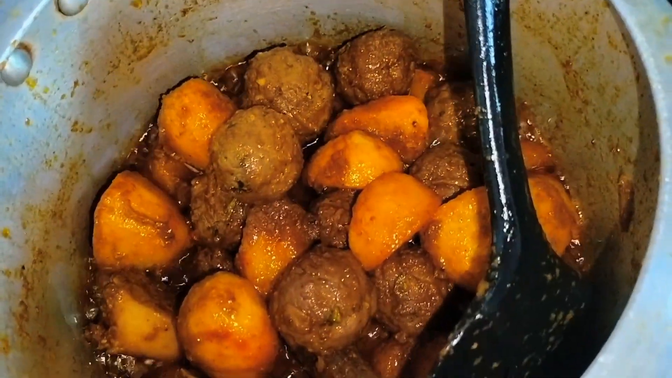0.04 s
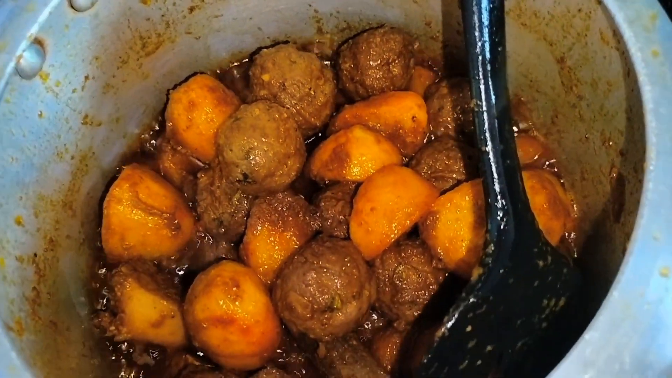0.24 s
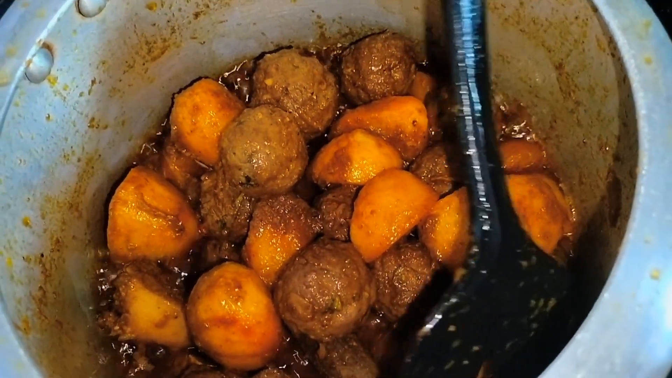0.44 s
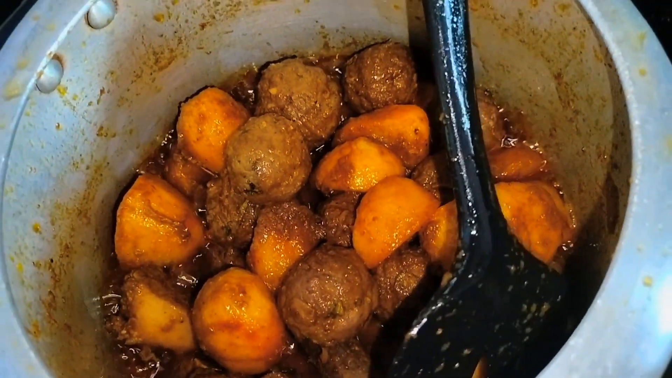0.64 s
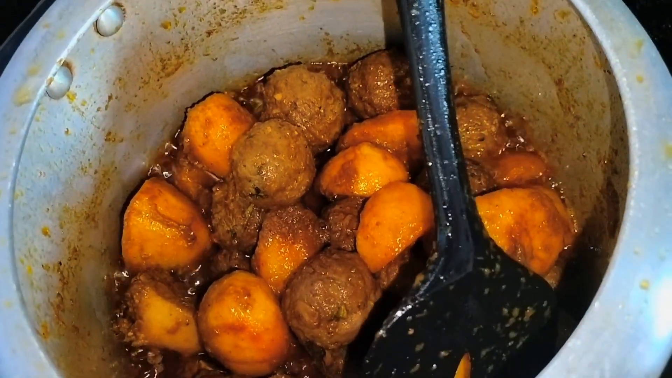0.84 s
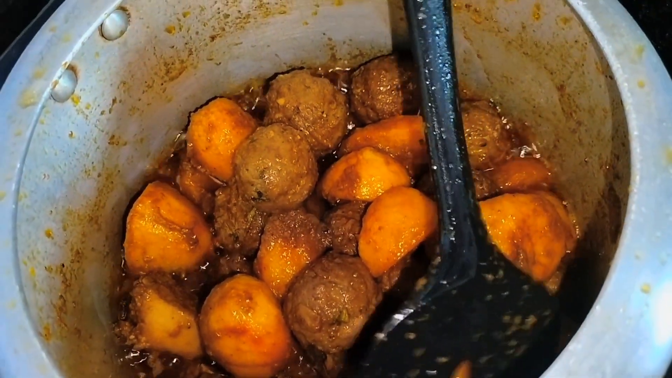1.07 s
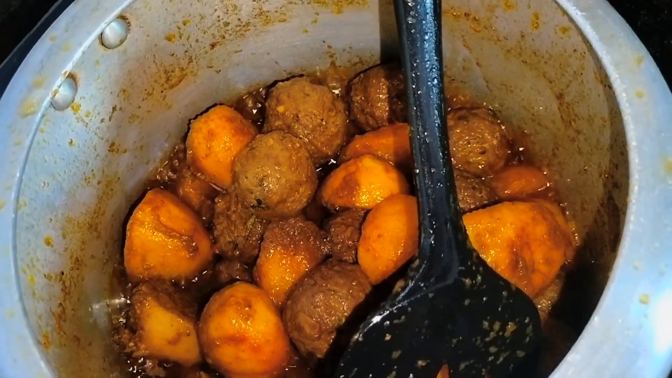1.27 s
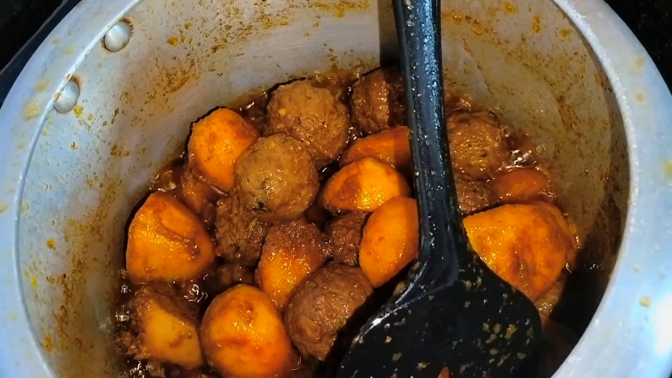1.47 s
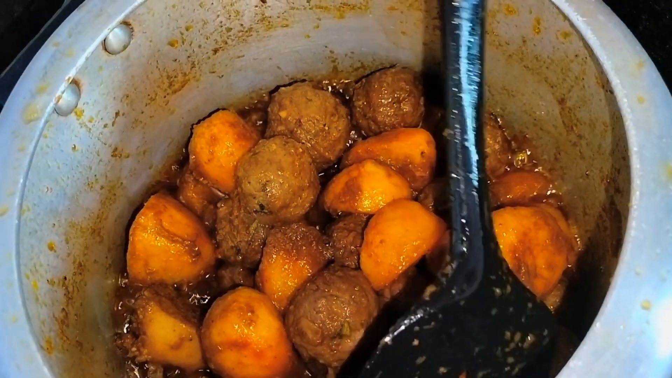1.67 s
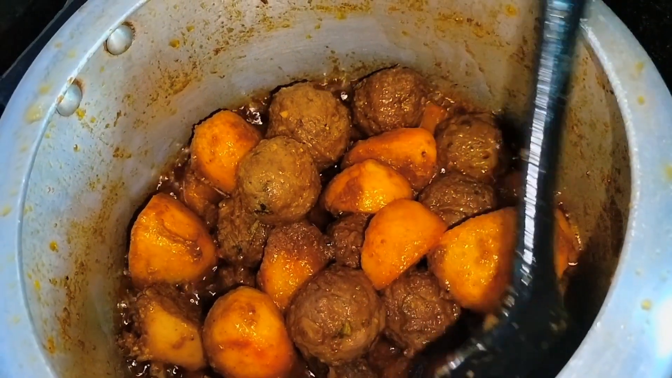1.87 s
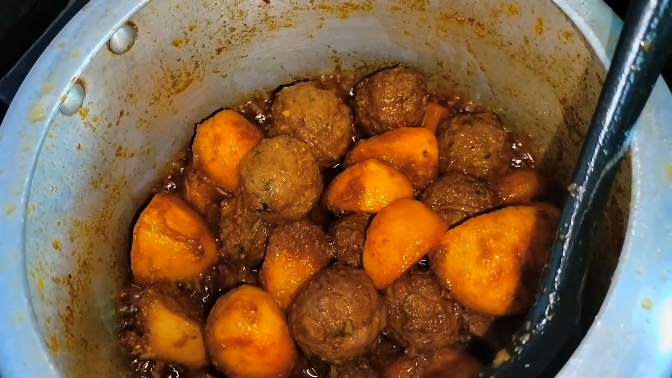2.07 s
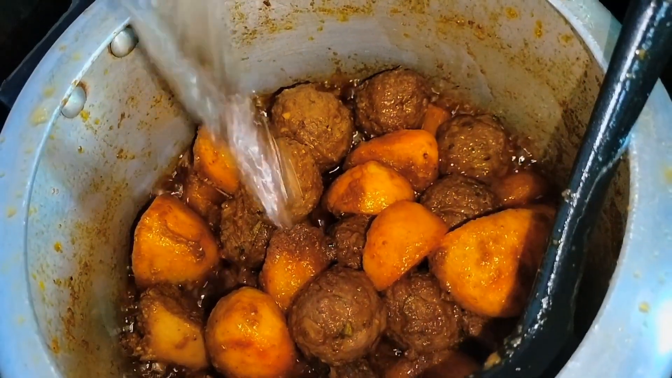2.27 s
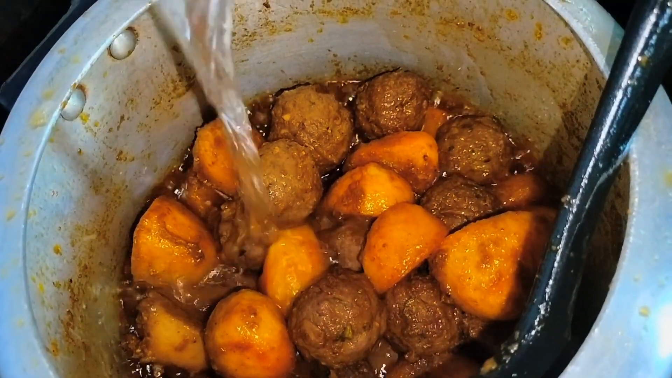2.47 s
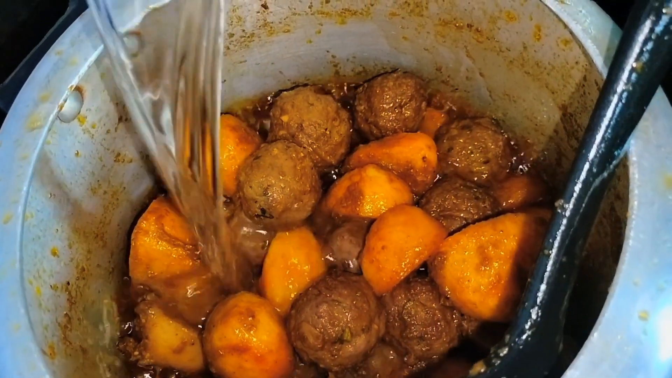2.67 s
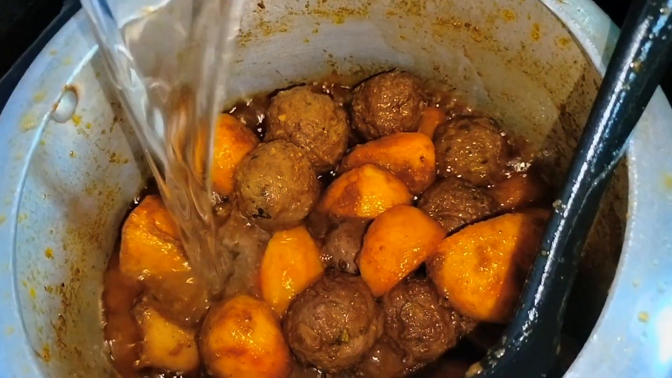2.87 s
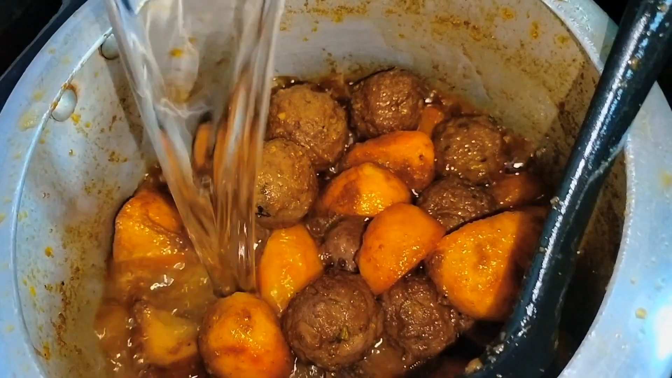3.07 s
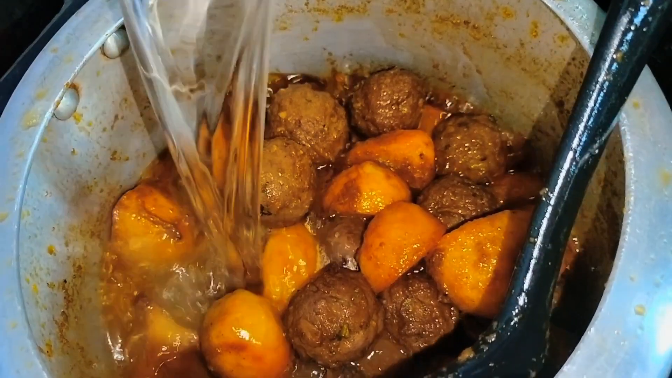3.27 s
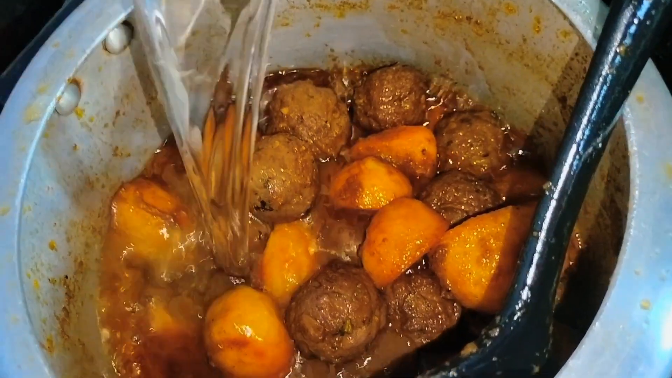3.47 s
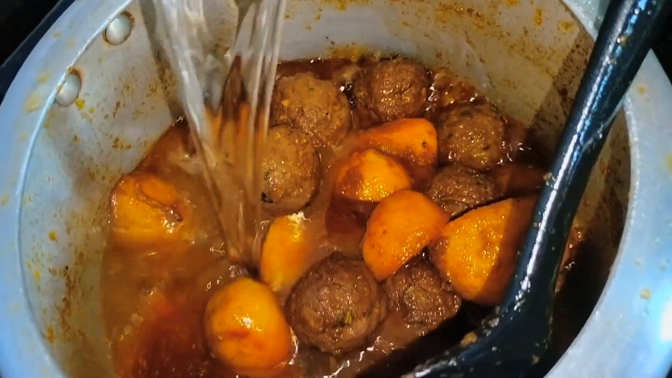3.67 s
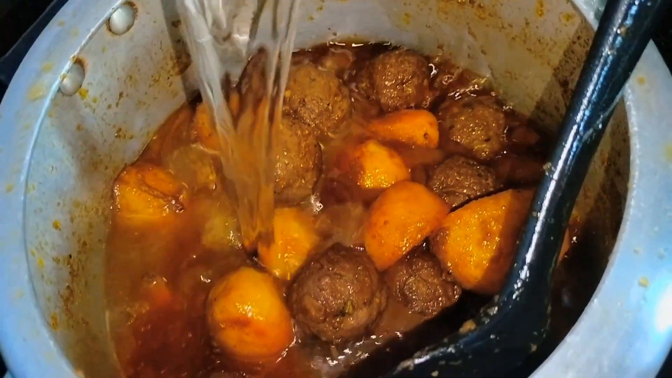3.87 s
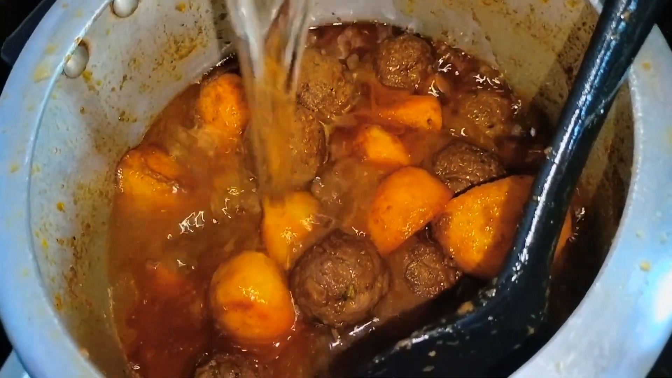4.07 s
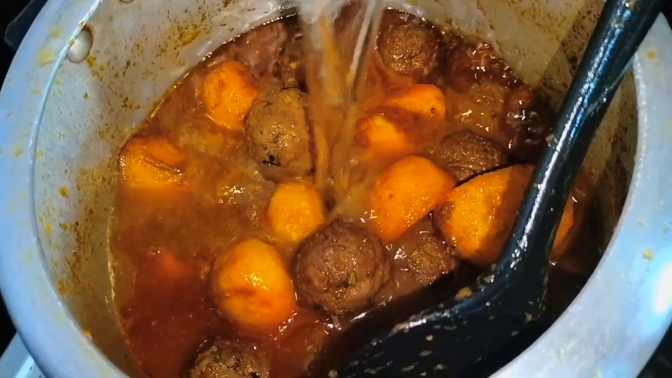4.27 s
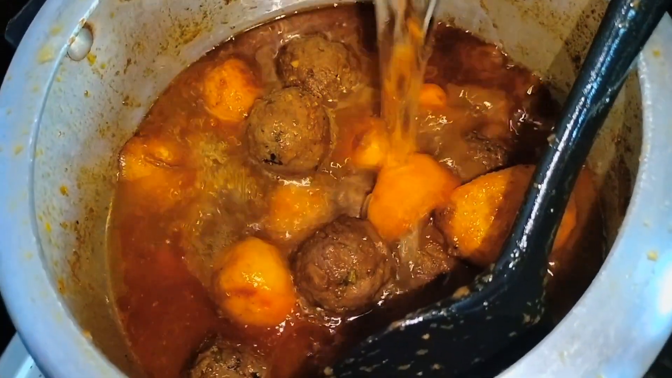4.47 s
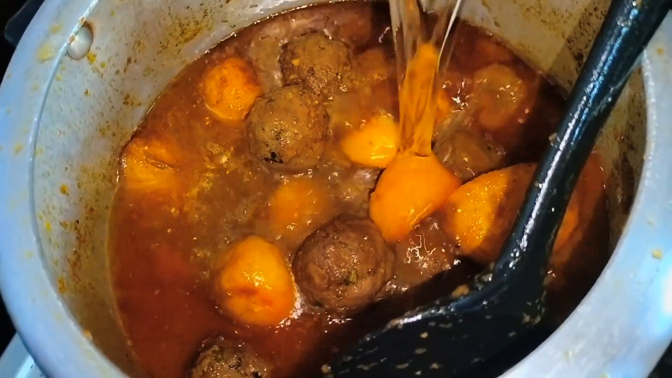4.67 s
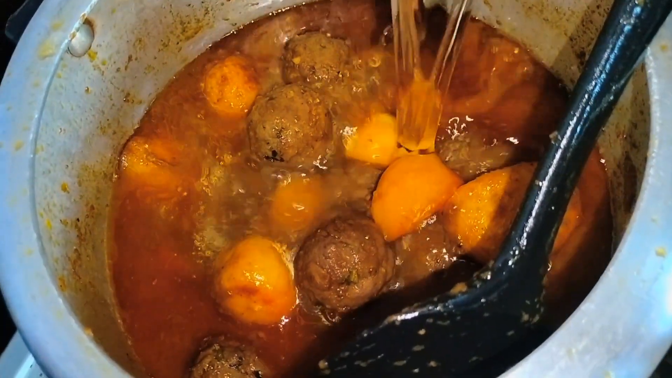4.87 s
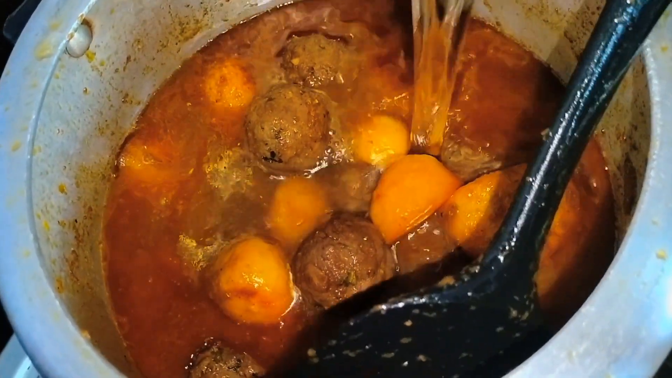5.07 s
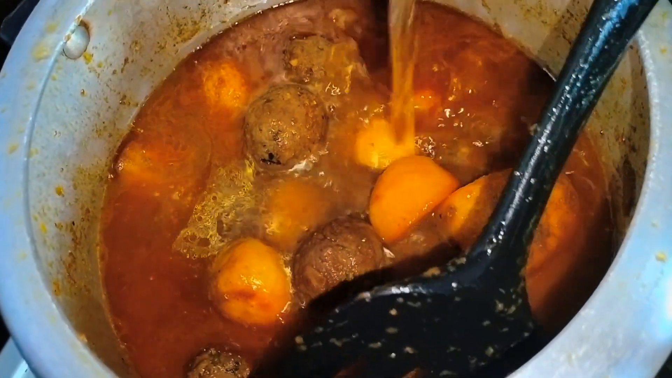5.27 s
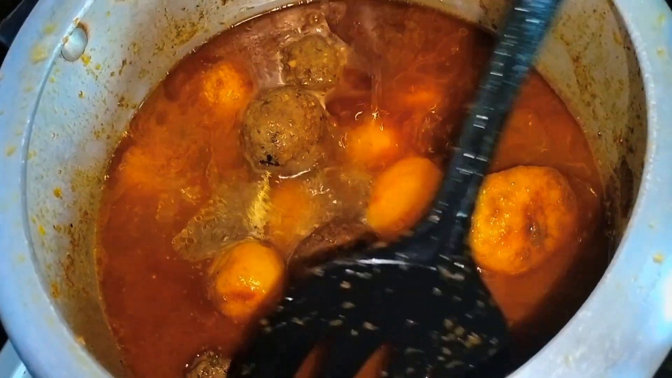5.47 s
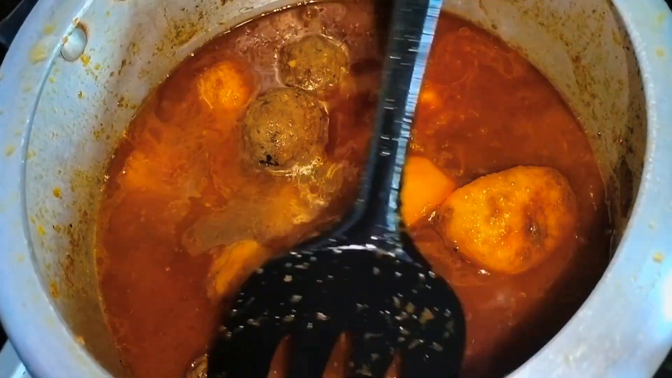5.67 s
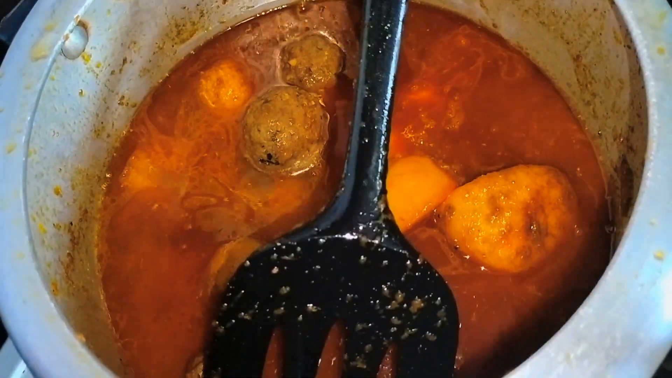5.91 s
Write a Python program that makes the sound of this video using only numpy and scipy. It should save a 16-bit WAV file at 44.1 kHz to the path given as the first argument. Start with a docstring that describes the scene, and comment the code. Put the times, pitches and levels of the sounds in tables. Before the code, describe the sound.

Thick sauce bubbles and fizzes in a metal pot, a spatula knocks it, then poured water quenches the boil to a trickle before stirring resumes.

```python
"""Curry simmering in a metal pot

In a kitchen, close to the microphone, swarms of decaying sines gurgle, pop and fizz in thick sauce. A spatula
rubs along the wall as a bending whine and knocks the pot's modes; steam squeezed from under it sizzles. Water
drums as resonant noise, churns the sauce, traps plinking bubbles and quenches the boil. As the stream thins to
a trickle, the spatula drags and scrapes in noisy slips through the sauce again."""
import sys
import numpy as np
from scipy import signal
from scipy.fft import rfft, irfft
from scipy.io import wavfile

SR = 44100
rng = np.random.default_rng(int(sys.argv[2]) if len(sys.argv) > 2 else 0)


def int16_out(signal):
    """Quantize to a 16-bit WAV file."""
    q = np.round(np.clip(np.atleast_2d(signal).T, -1, 1) * 32767)
    wavfile.write(sys.argv[1], SR, q.astype(np.int16))


N = 261998
HZ = np.fft.rfftfreq(N, 1 / SR)
TIME = np.arange(N) / SR


def amp(db):
    """Decibels to gain."""
    return 10 ** (np.asarray(db) / 20)


def unit(x):
    """Scales to rms 1."""
    return x / np.sqrt(np.mean(x ** 2) + 1e-20)


def read(points, hz):
    """Reads a two-column table on a log-frequency axis."""
    f, value = np.transpose(points)
    return np.interp(np.log(hz + 1), np.log(f + 1), value)


def level(table, column=1):
    """One dB column of a curve as a gain per sample."""
    table = np.asarray(table)
    return amp(np.interp(TIME, table[:, 0], table[:, column]))


def swells(table, column=2):
    """Bell-shaped lifts from one dB column of a table, as a gain per sample."""
    return amp(sum(row[column] * np.exp(-((TIME - row[0]) / row[1]) ** 2) for row in table))


def tint(x, db):
    """Filters by a gain in dB per frequency."""
    return irfft(rfft(x) * amp(db), N)


def wander(rate_hz):
    """Noise of rms 1 that wanders mostly below a rate."""
    return unit(tint(rng.standard_normal(N), -10 * np.log10(1 + (HZ / rate_hz) ** 4)))


def waver(depth_db, rate_hz):
    """A gain that wanders at random by an rms depth, mostly slower than a rate."""
    return amp(depth_db * wander(rate_hz))


def pan(db):
    """Left and right gains for a level difference, left minus right."""
    return amp(np.array([[db], [-db]]) / 2)


def add(mix, s, sound):
    """Adds a sound into the mix at a time."""
    part = mix[..., round(s * SR):][..., :sound.shape[-1]]
    part += sound[..., :part.shape[-1]]


def echoes(wall_db, wall_t60, room_db, room_t60):
    """Paths from one spot to both ears: direct, off the pot wall, then off the kitchen."""
    t = np.arange(SR // 3) / SR
    paths = np.zeros((2, len(t)))
    for db, t60, first_s in (wall_db, wall_t60, .0012), (room_db, room_t60, .007):
        sparse = rng.standard_normal(paths.shape) * (rng.random(paths.shape) < .2)
        taps = sparse * amp(-60 * t / t60) * (t > first_s)
        paths += amp(db) * taps / np.linalg.norm(taps, axis=1, keepdims=True)
    # the direct path reaches the left up to a third of a millisecond later, depending on the spot
    paths[0, rng.integers(0, 16)] = paths[1, 0] = 1
    return paths


def bubble(hz, decay_s, rise):
    """A trapped pocket of air rings down; its pitch climbs as it nears the surface."""
    age = np.arange(int(6 * decay_s * SR) + 2) / (SR * decay_s)
    turns = np.cumsum(hz * (1 + rise * np.minimum(age, 3))) / SR
    return np.sin(2 * np.pi * turns) * np.exp(-age) * (1 - np.exp(-2 * turns))


def swarm(lo_hz, hi_hz, per_s, cycles, spread_db, clump_db, wall_db, count=30):
    """Bubbles of many sizes burst in clumps, each size at its own spot in the pot."""
    clumps = waver(clump_db, 22)
    out = np.zeros((2, N))
    for hz in np.linspace(lo_hz, hi_hz, count):
        ring = bubble(hz, cycles / hz, 0.04)
        when, size, sign = rng.random((int(per_s * N / SR / count), 3)).T
        bursts = np.zeros(N)
        bursts[(when * N).astype(int)] = np.sign(sign - .5) * amp(spread_db * np.minimum(-np.log(size), 4.5))
        heard = signal.fftconvolve(echoes(wall_db, 0.063, -5.5, 0.21), ring[None], axes=1)
        heard /= np.linalg.norm(heard)
        out += signal.oaconvolve((bursts * clumps)[None], heard, axes=1)[:, :N]
    return out


# hollow resonances of the pot: pitch_hz, width_hz, lift_db
HOLLOW = [(275.6, 32, 7.5), (421, 55, 3), (542, 44, 4.5), (1117, 54, 7.5), (1727, 44, 5), (2230, 8, 10),
          (2630, 110, 2.5), (3970, 60, 2)]


def in_pot(x, colour):
    """Colours a sound with the hollow of the pot; the middle comes out at rms 1."""
    lift = sum(db / (1 + (2 * (HZ - hz) / width) ** 2) for hz, width, db in HOLLOW)
    x = tint(x, read(colour, HZ) + lift)
    return x / np.std(x.mean(0))


# likeness of left and right, capped below 1 when played: pitch_hz, alike_share
LIKENESS = [(90, 1), (150, .86), (250, 0.99), (500, 0.8), (900, 0.78), (1500, 0.5), (4000, 0)]


def ports(x):
    """Two unrelated channels become alike at long wavelengths; the left one hears slightly later."""
    a, b = rfft(x)
    same = np.clip(read(LIKENESS, HZ), 0, .965)
    late = np.exp(-2j * np.pi * HZ * 0.00021)
    left = (same * a + np.sqrt(1 - same ** 2) * b) * late
    return irfft(np.array([left, a]), N)


def ringing(curve, rings):
    """A steady, irregular push keeps some resonances of the pot sounding."""
    gain = sum(amp(db) / (1 + ((HZ - hz) / width) ** 2) for hz, width, db in rings)
    return level(curve) * unit(tint(ports(rng.standard_normal((2, N))), 20 * np.log10(gain)))


# colour of the low room drone: pitch_hz, level_db (per Hz, relative)
DRONE_COLOUR = [(20, -18.5), (40, -12.5), (52, -8), (64, 5), (76, 1), (100, -3.5), (120, -6.5), (150, -9.5),
                (185, -3), (260, -40)]
# the rumble swells: top_s, half_length_s, lift_db
DRONE_SWELLS = [(3.98, 0.46, 5.5), (4.45, 0.12, 2.5), (5.2, 0.19, 2.5)]


def kitchen():
    """A low, wavering drone of noise, a narrow-band hum that fades during the pour, a very faint hiss."""
    drone = unit(tint(ports(rng.standard_normal((2, N))), read(DRONE_COLOUR, HZ)))
    drone *= amp(-55.5) * swells(DRONE_SWELLS) * waver(3, 6.5)
    hum = unit(tint(rng.standard_normal(N), -20 * np.log10(1 + ((HZ - 89) / 4) ** 2)))
    hum *= level([(0.2, -55.5), (3.3, -53.5), (4.2, -58.5)])
    return drone + hum + amp(-68.5) * rng.standard_normal((2, N))


# how hard the sauce is churned by steam, water and spatula, before trims: start_s, level_db
CHURN = [(0.21, -37), (0.9, -33.5), (1.6, -34.5), (2.1, -33.5), (3.1, -33), (4.1, -35.5), (4.55, -39.5),
         (5.3, -46.5), (5.6, -46), (5.78, -35), (5.94, -37)]
# how hard the sauce boils, before trims; the cold water quenches it: start_s, level_db
BOIL = [(0.21, -37.5), (0.6, -35), (1.2, -35.5), (2.3, -35), (2.85, -33.5), (3.6, -38), (4.2, -43),
        (4.6, -48.5), (5.3, -51), (5.7, -49), (5.94, -52.5)]
# a pocket of sauce boils up or the stream shifts: top_s, half_length_s, gurgle_lift_db, fizz_lift_db
SURGES = [(0.4, 0.047, 1.5, 4), (0.87, 0.086, 1.5, 2), (1.95, 0.064, 4, 0.5), (2.66, 0.012, -0.5, 5.5),
          (3.3, 0.013, 2, -1), (4.04, 0.038, 3, 3), (4.357, 0.011, 3, 10), (4.46, 0.042, 1, 14),
          (4.71, 0.021, 7, 8), (4.9, 0.049, 2, 6.5), (5.45, 0.024, 2, 4.5), (5.65, 0.027, 2.5, 12.5)]
# colours of gurgle and splash: pitch_hz, level_db (per Hz, relative)
CHURN_COLOUR = [(60, -48.5), (120, -19.5), (165, -25), (200, -15), (240, -3), (300, -2), (400, -0.5),
                (480, -2.5), (540, 1), (620, 1.5), (720, 1.5), (850, -10.5), (1100, -27.5), (2000, -72.5)]
SPLASH_COLOUR = [(400, -44), (700, -13.5), (850, -6), (1050, -2), (1200, -2), (1400, -6), (1600, -11.5),
                 (2000, -32.5), (4000, -81.5)]
GURGLE_DB, SPLASH_DB, POUR_SPLASH_DB = -0.66, -7, -11
SPLASH_FOLLOWS, POUR_SPLASH_FOLLOWS = 0.94, 0.69  # dB per dB of boil and of stream


def churn():
    """Large, heavily damped pockets of steam and air gurgle; splashes follow the boil and the stream."""
    deep = np.array([swarm(148.0, 911, 2600, 1.24, 2.3, 1.0, -6.5, count=10)[1] for _ in range(2)])
    light = np.array([swarm(695, 1685, 1500, 2.52, 3.6, 1.5, -2.4, count=10)[1] for _ in range(2)])
    # the gurgle leans to the right, most of all near 540 Hz
    lean_db = -1 - 3.5 / (1 + ((HZ - 540) / 150) ** 2)
    gurgle = tint(in_pot(ports(deep), CHURN_COLOUR), np.array([lean_db, -lean_db]) / 2)
    splash = in_pot(ports(light), SPLASH_COLOUR)
    boil_splash = amp(SPLASH_DB) * level(BOIL) ** SPLASH_FOLLOWS
    pour_splash = amp(POUR_SPLASH_DB) * level(STREAM) ** POUR_SPLASH_FOLLOWS
    splashing = np.hypot(boil_splash, pour_splash)
    return swells(SURGES) * (amp(GURGLE_DB) * level(CHURN) * gurgle + splashing * splash)


# colours of pops and fizz: pitch_hz, level_db (per Hz, relative)
POP_COLOUR = [(820, -43), (1400, -22), (1600, -14), (1950, -12), (2130, -8.5), (2280, -5), (2600, -2),
              (2950, -6.5), (3400, -11), (4400, -40.5), (7500, -96.5)]
FIZZ_COLOUR = [(1760, -29), (3000, -3.5), (3960, -1.5), (4380, -4), (4730, -8.5), (5770, -9.5),
               (7260, -25.5), (7870, -35.5), (10200, -67), (17300, -120)]
POP_DB, FIZZ_DB, SNAP_DB = -0.9, -2, -13
POP_SURGE_SHARE = 0.4  # part of a surge that reaches the larger bubbles


def boil():
    """Small bubbles pop under a fizz of still smaller ones; a few films snap with a dry crackle."""
    pops = in_pot(swarm(1438, 3265, 1900, 4.1, 3.4, 0.95, -3.5), POP_COLOUR) * pan(1.0)
    fizz = in_pot(swarm(3085, 7730, 1700, 3.7, 2.43, 0.76, 0.0, count=44), FIZZ_COLOUR) * pan(-1.3)
    snaps = in_pot(swarm(2500, 6500, 70, 0.59, 4.6, 0.89, -12.0, count=6), FIZZ_COLOUR)
    surge = swells(SURGES, column=3)
    popping = amp(POP_DB) * surge ** POP_SURGE_SHARE * pops
    fizzing = surge * (amp(FIZZ_DB) * fizz + amp(SNAP_DB) * snaps)
    return level(BOIL) * waver(0.86, 6.7) * (popping + fizzing)


# the spatula rubs along the wall, before trims and jitter: start_s, level_db, pitch_hz
RUB = [(0.21, -37, 2350), (0.26, -35.5, 2294.5), (0.35, -33.5, 2324), (0.401, -41, 2346), (0.46, -38, 2301),
       (0.51, -31, 2370.5), (0.556, -24, 2369.5), (0.62, -31, 2320), (0.7, -41, 2275), (0.76, -35.5, 2340),
       (0.846, -33, 2310), (0.9, -34, 2286.5), (0.98, -36, 2349), (1.1, -50.5, 2330), (2.1, -81, 2326.5)]
# wall resonances it stirs: pitch_hz, width_hz, level_db (relative)
RUB_RINGS = [(2263, 24, -5.5), (2380, 12, -2.5), (2570, 18, -8.5)]
WHINE_DB, RUB_RINGS_DB = -3, -4.5
RUB_JITTER, RUB_JITTER_HZ = .012, 140  # rms share of pitch, and its rate


def rubbing():
    """The spatula slips along the wall: a rough whine bends with the stroke and stirs resonances."""
    s, _, hz = np.transpose(RUB)
    pitch_hz = np.interp(TIME, s, hz) * (1 + RUB_JITTER * wander(RUB_JITTER_HZ))
    turns = np.cumsum(pitch_hz) / SR
    # the left lags by a part of a turn and each side flutters on its own
    whine = np.array([np.sin(2 * np.pi * (turns - lag)) * waver(3.4, 100) for lag in (.12, 0)])
    stirred = amp(RUB_RINGS_DB) * ringing(RUB, RUB_RINGS)
    return pan(2) * (amp(WHINE_DB) * level(RUB) * unit(whine) + stirred)


# steam squeezed out from under the spatula sizzles: start_s, level_db
SIZZLE = [(0.31, -64), (0.37, -28.5), (0.41, -30.5), (0.46, -29), (0.52, -46), (0.65, -78.5)]
# its resonances: pitch_hz, width_hz, level_db (relative)
SIZZLE_RINGS = [(3630, 50, -6.5), (3775, 50, -1), (4100, 70, -7)]


def sizzle():
    """Steam squeezed out from under the spatula sizzles as noise through narrow, high resonances."""
    return ringing(SIZZLE, SIZZLE_RINGS)


DRIP_FROM_S, DRIP_TO_S, DRIPS_PER_S = 3.2, 5.6, 16
DRIP_DB, DRIP_SPREAD_DB = -44.5, 7
DRIP_LO_HZ, DRIP_HI_HZ, DRIP_DECAY_MS = 1900, 5460, 3.6


def drips():
    """Stray small plinks as the boil dies down, random in time, pitch and spot, in rows like BUBBLES."""
    span_s = DRIP_TO_S - DRIP_FROM_S
    rows = []
    for when, size, pitch, spot in rng.random((int(DRIPS_PER_S * span_s), 4)):
        db = DRIP_DB + DRIP_SPREAD_DB * (size - pitch)
        hz = DRIP_LO_HZ * (DRIP_HI_HZ / DRIP_LO_HZ) ** pitch
        rows.append((DRIP_FROM_S + when * span_s, db, hz, DRIP_DECAY_MS, 3 - 12 * spot, .06))
    return rows


PLINK_SWELL_CYCLES, PLINK_FALL = 1.1, 1.2  # swells as its neck pinches off; damping grows with age


def plink(hz, decay_s, rise):
    """A large bubble pinches off, swells within a few cycles and chirps upward as it fades."""
    age = np.arange(int(4 * decay_s * SR) + 2) / (SR * decay_s)
    turns = np.cumsum(hz * (1 + rise * age)) / SR
    return np.sin(2 * np.pi * turns) * np.exp(-age ** PLINK_FALL) * (1 - np.exp(-turns / PLINK_SWELL_CYCLES))


# single large bubbles: start_s, level_db, pitch_hz, decay_ms, left_minus_right_db,
# rise_share (of pitch, per decay time)
BUBBLES = [(0.313, -24, 2380, 2.5, 4, .04), (0.344, -14.5, 2460, 1.6, 7, .04),
           (0.4155, -9.5, 2660, 2.2, 4, .05), (0.4449, -12.5, 2420, 2.6, 8, .04),
           (0.554, -22, 600, 4, -4, .08), (0.566, -23, 2720, 3.2, 0, .03), (0.5974, -26, 2520, 3.7, 2, .03),
           (0.7487, -15.5, 4040, 1.1, -6, .04), (0.842, -23, 2450, 3.9, 3, .04),
           (0.888, -18, 3520, 1.8, -9, .04), (1.3308, -22, 2670, 3.4, 2, .04),
           (1.4177, -19.5, 3670, 2.2, -3, .04), (1.5385, -22.5, 3450, 2.2, -5, .04),
           (1.579, -18.5, 2730, 2.2, 0, .04), (1.8113, -21, 2170, 5.5, 4, 0.067),
           (2.4294, -23, 3250, 2.5, 0, .04), (2.488, -23, 1950, 3.2, 7, .06),
           (2.5248, -19.5, 2500, 3.6, 2, .05), (2.5753, -20, 2600, 3.8, 2, .04),
           (2.6581, -20, 2540, 4, 0, .04), (2.7644, -22, 3270, 2.8, -3, .04),
           (2.793, -20, 2440, 5.7, 6, .04), (2.943, -20.5, 1020, 4.3, 2, .05),
           (2.985, -18.5, 3750, 2.6, -6, .04), (3.1614, -11.5, 2610, 3.7, 4, .05),
           (3.2984, -21, 2600, 3.7, -1, .04), (3.565, -23, 504, 4, -6, .05),
           (3.732, -28, 1685, 9.5, -4, .03), (3.737, -31, 4200, 5.5, 6, .03),
           (3.767, -27, 1075, 5.5, -5, .06), (3.816, -16.5, 2090, 3.2, -1, .12),
           (3.829, -21.5, 2460, 4.7, -2, .08), (3.884, -27, 1040, 3.7, -3, .08),
           (3.942, -25, 527, 4.4, -4, .1), (3.979, -27, 684, 3.6, -7, .1), (3.993, -23.5, 570, 4, -9, .08),
           (4.032, -24, 730, 2.1, -5.5, .08), (4.029, -25, 2240, 4, 0, .05), (4.036, -23, 1700, 3, -1, .12),
           (4.0389, -18.5, 2380, 3, 0, .08), (4.076, -27, 573, 5.3, -5, .1),
           (4.159, -25, 535, 7.9, -10.5, .08), (4.166, -24.5, 976, 5, -7, .08),
           (4.174, -24, 685, 5.6, -6, .06), (4.2032, -25.5, 1590, 6, -5, .09),
           (4.216, -24, 2165, 9, 3, .11), (4.276, -24.5, 571, 5, -5, .06),
           (4.3449, -10.5, 1940, 4.7, 4, .19), (4.349, -15.5, 2900, 1.9, 5, .15),
           (4.354, -17, 2250, 2.5, -5, .12), (4.357, -25, 1080, 4.5, -9, .06),
           (4.357, -30, 5500, 3.6, 0, .04), (4.365, -22, 2550, 3, 1, .08), (4.446, -25, 3500, 3, 2, .04),
           (4.453, -22, 4320, 4.4, 4, .03), (4.482, -29, 3490, 5, 5, .05), (4.494, -29, 3750, 3, 2, .04),
           (4.538, -31, 3660, 4, -3, .05), (4.6867, -35, 3200, 3.4, -5, .05),
           (4.699, -30, 970, 4.2, -4, .08), (4.7143, -27, 3080, 3.1, -12, .06),
           (4.72, -25.5, 2720, 5.9, -5, .07), (4.794, -28.5, 3200, 3.6, -8, .05),
           (4.8294, -27.5, 3730, 2.9, 0, .05), (4.8615, -19, 3890, 1.5, -7, .04),
           (4.9048, -32, 3890, 2.2, 1, .04), (4.9304, -31, 3080, 3.6, -5, .06),
           (4.934, -36, 5550, 3.5, -2, .04), (4.982, -35, 4300, 3.5, 4, .04),
           (5.1365, -26.5, 3520, 3.2, -6, .04), (5.147, -31.5, 2820, 3.3, -5, .05),
           (5.1904, -36, 2550, 3, -2, .08), (5.2003, -32, 2930, 3, 0, .05), (5.226, -37, 4300, 2.6, 0, .04),
           (5.2344, -36, 3400, 2.5, -5, .05), (5.256, -32, 3640, 2.8, -6, .05),
           (5.265, -39, 6150, 4, -2, .03), (5.3585, -25, 3800, 1.2, -2, .05),
           (5.4364, -32, 4200, 2, -3, .04), (5.451, -27, 3960, 3.2, 3, .05),
           (5.457, -36, 5400, 3.2, -1, .03), (5.459, -36, 2830, 2.7, -2, .08),
           (5.5129, -39, 5800, 4, 1, .04), (5.5695, -26, 3760, 4.3, -6, .04),
           (5.6324, -28, 3480, 3, -12, .04), (5.665, -15, 3330, 1.9, -7, .04)]
SPRAY_DB, SPRAY_FADE_DB, SPRAY_S = -14, 7.5, .026  # level, fade with lateness, length
SPRAY_CYCLES = 4.5  # scales how long the spray rings
PLINK_ECHO_DB = -8


def plinks():
    """Large bubbles plink upward, each sheds a faint spray of small ones; wall and room echo them."""
    out = np.zeros((2, N))
    for s, db, hz, decay_ms, side_db, rise in BUBBLES + drips():
        ring = np.zeros(SR // 10)
        add(ring, 0, plink(hz, decay_ms / 1e3, rise))
        for late, size, damping in rng.random((8, 3)):
            small_hz = hz * 2 ** (1.3 * size - .6)
            drop = bubble(small_hz, SPRAY_CYCLES * (.15 + damping ** 2) / small_hz, 0.056)
            add(ring, SPRAY_S * late ** 2, amp(SPRAY_DB - SPRAY_FADE_DB * late) * drop)
        ring = amp(db) * pan(side_db) * ring
        echo = signal.fftconvolve(echoes(4.1, 0.037, -2.2, 0.24), ring, axes=1)
        add(out, s, ring)
        add(out, s + 0.001632, amp(PLINK_ECHO_DB) * echo)
    return tint(out, -10 * np.log10(1 + (HZ / 6500) ** 12))


# the shoved sauce heaves against the pot: start_s, level_db
SLOSH = [(0.43, -75), (0.465, -30), (0.5, -30), (0.55, -34.5), (0.6, -41), (0.65, -70)]
# its resonances: pitch_hz, width_hz, level_db (relative)
SLOSH_RINGS = [(101, 20, -9.5), (185, 30, -8), (268, 28, 0), (436, 35, 5)]


def slosh():
    """Sauce heaving against the pot sounds as noise through its low resonances."""
    return ringing(SLOSH, SLOSH_RINGS)


def modes(table, t):
    """Damped sines, a little later on the left."""
    ears_t = t - np.array([[.00008], [0]])
    return sum(amp(db - 60 * t / t60) * np.sin(2 * np.pi * hz * ears_t + rng.uniform(0, 2 * np.pi))
               for hz, db, t60 in table)


# the spatula meets the pot: start_s, thud_db, base_ring_db, wall_ring_db, spot (0 side to 1 front)
KNOCKS = [(0.448, -17.5, -22, -31, 0.035), (0.473, -28.5, -24.5, -35, 0.069),
          (5.713, -34, -49.5, -33.5, 0.84)]
# modes of the pot's base: pitch_hz, level_db (relative), t60_s
BASE_MODES = [(125, -17.5, 0.17), (191, -13, 0.12), (260, -10.5, 0.27), (443.6, 5.5, 0.14),
              (502, 0.5, 0.088), (576, -19, 0.12), (1206, -31.5, .12), (1355, -2, 0.054)]
# modes of the wall: pitch_hz, struck_at_side_db, struck_at_front_db (both relative), t60_s
WALL_MODES = [(1730, -24.5, -9, 0.34), (2040, -24, 2.5, 0.3), (2320, -9, -6, 0.15), (2350, 2.5, -24, 0.37),
              (2460, -12, -14, .5), (2719, -13, -2.5, 0.32), (3620, -13, -9, .13), (3670, -11, -2.5, 0.39),
              (3760, -14, -1, 0.27), (3962, -17, 0, 0.37)]
# colour of the dull push into sauce: pitch_hz, level_db (relative)
THUD_COLOUR = [(50, -26.5), (110, -10), (220, -7), (450, -3), (800, -5), (1400, -4), (2000, -9),
               (5000, -29), (8000, -61)]


def spatula():
    """Each knock thuds into the sauce and rings base and wall; the spot balances the wall's modes."""
    t = np.arange(SR) / SR
    push, rings = np.zeros(N), np.zeros((2, N))
    attack = 1 - np.exp(-t / 0.0008)
    for s, thud_db, base_db, wall_db, spot in KNOCKS:
        wall = [(hz, side + spot * (front - side), t60) for hz, side, front, t60 in WALL_MODES]
        add(push, s, attack * amp(thud_db - 60 * t / 0.14))
        add(rings, s, attack * (amp(base_db) * modes(BASE_MODES, t) + amp(wall_db) * modes(wall, t)))
    thud = unit(tint(ports(rng.standard_normal((2, N))), read(THUD_COLOUR, HZ)))
    return rings + push * thud


# air escapes from under the spatula: start_s, level_db, pitch_hz, decay_ms
GULPS = [(0.489, -19, 242.3, 11), (0.508, -20, 484, 6.6), (0.527, -19, 525, 6.2), (0.569, -23, 410, 5)]


def gulps():
    """Large pockets of air, trapped as the spatula shoves the sauce, escape with low, rising gulps."""
    out = np.zeros((2, N))
    for s, db, hz, decay_ms in GULPS:
        add(out, s, amp(db) * pan(-5) * bubble(hz, decay_ms / 1e3, rise=0.083))
    return out


# stray droplets tick on the metal, before filtering: start_s, level_db
TICKS = [(0.749, -46), (0.895, -40), (2.654, -34), (2.668, -36), (4.803, -33), (5.256, -38), (5.664, -24.5),
         (5.688, -34)]


def ticks():
    """Each droplet lands with a tiny, bright burst of noise, stronger on the right."""
    t = np.arange(SR // 20) / SR
    out = np.zeros((2, N))
    for s, db in TICKS:
        add(out, s, amp(db - 60 * t / 0.016) * rng.standard_normal((2, len(t))))
    return pan(-6) * tint(out, -10 * np.log10(1 + (8000 / (HZ + 1)) ** 6))


# the falling stream drums on the pot: start_s, level_db
STREAM = [(2.2, -75), (2.6, -45), (3.05, -41), (3.5, -44.5), (4.2, -45), (4.6, -57), (5.3, -60), (5.5, -70)]
# resonances it drives: pitch_hz, width_hz, level_db (relative)
STREAM_RINGS = [(277, 25, -1.5), (392, 22, -6.5), (1116, 26, -4), (1740, 60, -6.5)]


def stream():
    """Falling water drums on the pot as noise through its resonances."""
    return ringing(STREAM, STREAM_RINGS)


# drops from the breaking stream: start_s, level_db
PATTER = [(2.2, -63), (2.55, -43.5), (2.8, -39.5), (3.1, -47.5), (3.7, -43), (4.4, -46.5), (4.9, -51.5),
          (5.3, -56), (5.55, -66), (5.7, -72)]
# the thinning stream trickles: start_s, level_db
TRICKLE = [(3.2, -59), (4.3, -47), (4.75, -45.5), (5.05, -49), (5.45, -49.5), (5.65, -49.5), (5.8, -65)]
# colours of both: pitch_hz, level_db (per Hz, relative)
PATTER_COLOUR = [(800, -29.5), (1700, -7.5), (2600, -1), (4000, 1.5), (4800, -6), (6000, -4), (7200, -24.5),
                 (8500, -47)]
TRICKLE_COLOUR = [(800, -2), (1500, -4), (2800, -2), (3900, -2), (4800, -8), (5900, -5.5), (7200, -21),
                  (8500, -45.5)]


def droplets():
    """The full stream splatters densely on the sauce; as it thins, it trickles with small, clear bubbles."""
    splatter = in_pot(swarm(1900, 6700, 1900, 2.8, 3.0, 1.2, -4, count=24), PATTER_COLOUR)
    trickle = in_pot(swarm(800, 6200, 480, 7, 2.9, 1.2, -4, count=40), TRICKLE_COLOUR)
    return level(PATTER) * splatter + pan(-1.5) * level(TRICKLE) * trickle


SLIPS_PER_S, SLIP_GRIT = 260, 1.4  # grit: steady part of the push under the slips
SLIP_BEND, SLIP_BEND_HZ = .005, 20  # rms share of pitch, and its rate


def slipping(curve, rings):
    """The spatula sticks and slips, kicking the pot's resonances, which bend under its changing load."""
    slips = rng.standard_normal(N) * (rng.random(N) < SLIPS_PER_S / SR)
    grit = signal.lfilter([1], [1, -np.exp(-1 / (0.0019 * SR))], abs(slips))
    drive = ports((unit(grit) + SLIP_GRIT) * rng.standard_normal((2, N)))
    body = sum(amp(db) / (1 + 1j * (HZ - hz) / width) ** 2 for hz, width, db in rings)
    sound = unit(irfft(rfft(drive) * body, N))
    # reading the sound at a wandering speed bends its pitch
    bend = SLIP_BEND * wander(SLIP_BEND_HZ)
    bent = TIME + np.cumsum(bend - bend.mean()) / SR
    return level(curve) * np.array([np.interp(bent, TIME, ear) for ear in sound])


# the spatula drags over the base: start_s, level_db
DRAG = [(5.6, -74), (5.66, -45.5), (5.755, -32.5), (5.84, -31.5), (5.94, -35.5)]
# resonances it kicks: pitch_hz, width_hz, level_db (relative)
DRAG_RINGS = [(187, 37, -10), (288, 27, -4), (420, 48, -5), (554, 32, 1.5), (600, 22, -3), (717, 20, -.5),
              (900, 60, -11.5), (1040, 40, -15), (1213, 20, -1.5)]


def drag():
    """Slips over the base kick its low resonances, a little to the right."""
    return pan(-2) * slipping(DRAG, DRAG_RINGS)


# the spatula's edge scrapes the wall on the way: start_s, level_db
SCRAPE = [(5.69, -80), (5.718, -36), (5.76, -43.5), (5.8, -46), (5.825, -40.5), (5.85, -53), (5.94, -55)]
# resonances it kicks: pitch_hz, width_hz, level_db (relative)
SCRAPE_RINGS = [(1760, 80, -9.5), (2030, 26, -0.5), (2220, 70, -6.5), (2480, 36, -5), (2700, 40, -3.5),
                (3780, 60, -3.5), (3970, 50, -7.5), (4850, 160, -13.5), (5800, 220, -13)]


def scrape():
    """Slips of the edge along the wall kick its high resonances."""
    return slipping(SCRAPE, SCRAPE_RINGS)


def scene():
    """Everything in and around the pot."""
    sauce = churn() + boil() + sizzle() + plinks() + gulps()
    water = ticks() + stream() + droplets()
    stirring = rubbing() + slosh() + spatula() + drag() + scrape()
    return kitchen() + sauce + water + stirring


# treble response of the microphone: pitch_hz, level_db
MICROPHONE = [(20, 0), (7000, 0), (7900, -3), (8500, -13), (10000, -20), (12000, -18), (16000, -20)]
START_S, EDGE_HZ = 0.2095, 15750


def record(dry):
    """The microphone opens after a moment and dulls the treble; then the band limit."""
    opening = np.clip((TIME - START_S) / 0.00083, 0, 1)
    sound = tint(dry, read(MICROPHONE, HZ)) * opening
    band_limit = signal.firwin(511, EDGE_HZ, window=("kaiser", 9), fs=SR)
    return signal.oaconvolve(sound, band_limit[None], "same")


dry = scene()
out = record(dry)
int16_out(out)
```